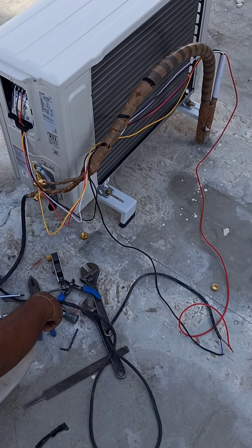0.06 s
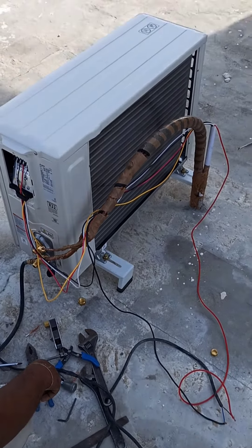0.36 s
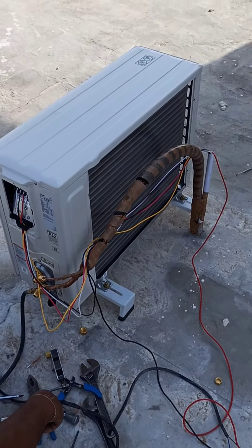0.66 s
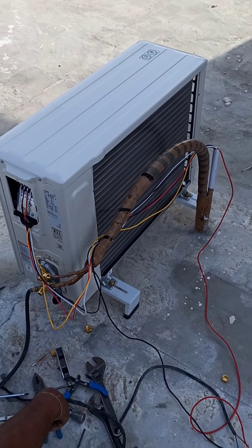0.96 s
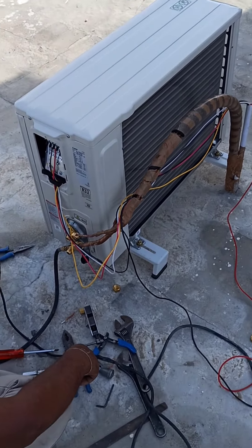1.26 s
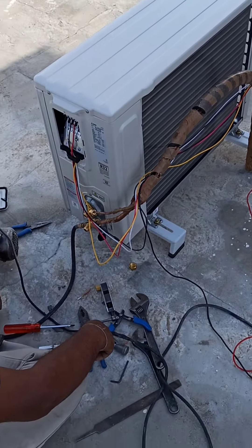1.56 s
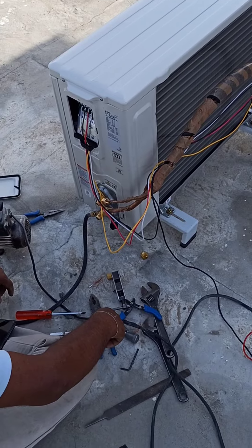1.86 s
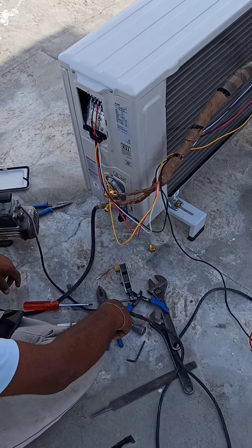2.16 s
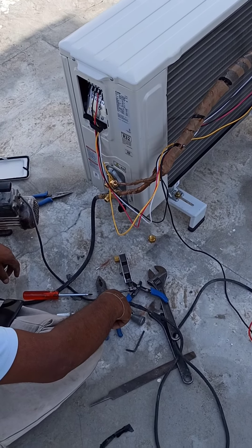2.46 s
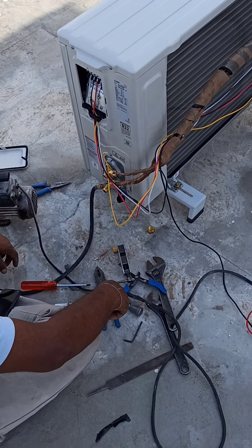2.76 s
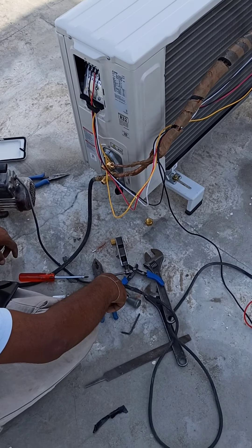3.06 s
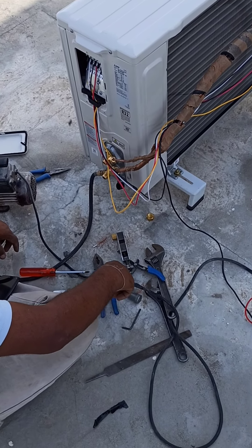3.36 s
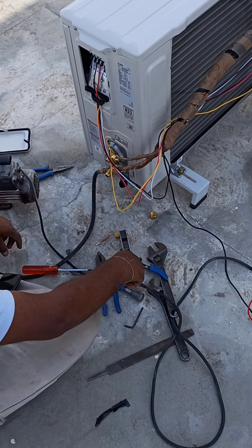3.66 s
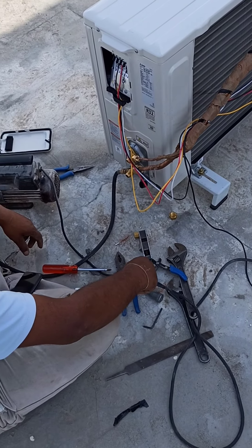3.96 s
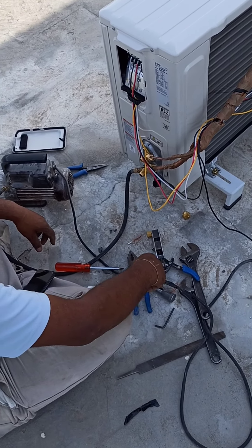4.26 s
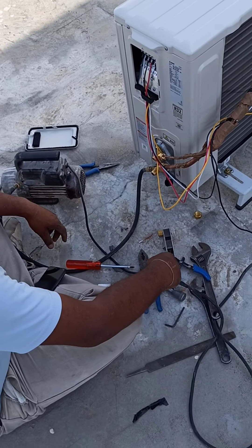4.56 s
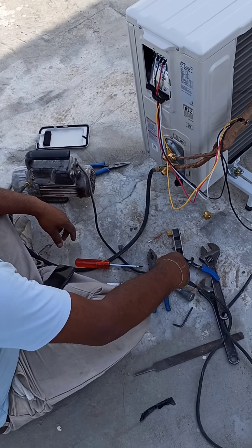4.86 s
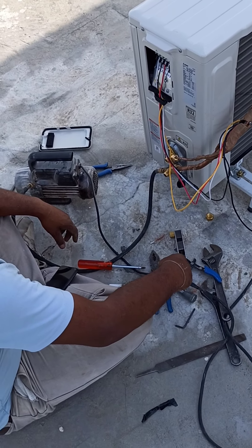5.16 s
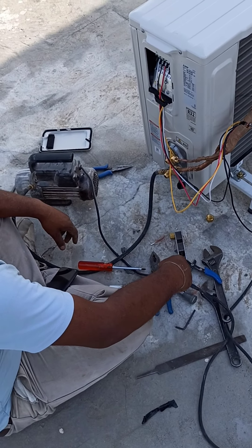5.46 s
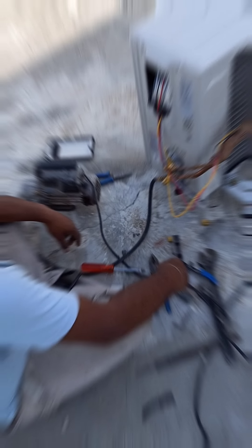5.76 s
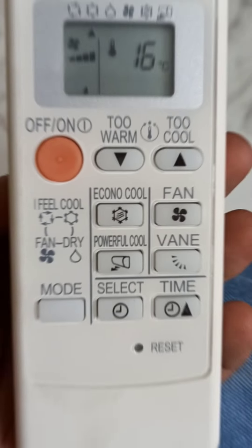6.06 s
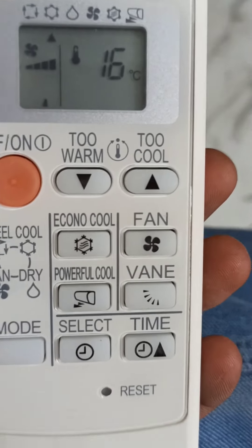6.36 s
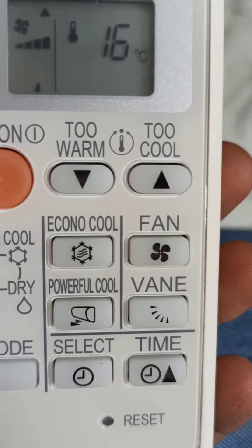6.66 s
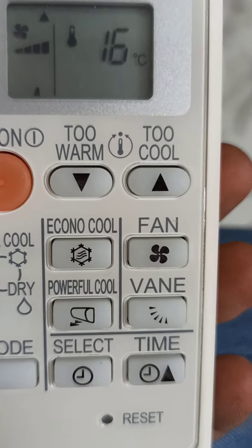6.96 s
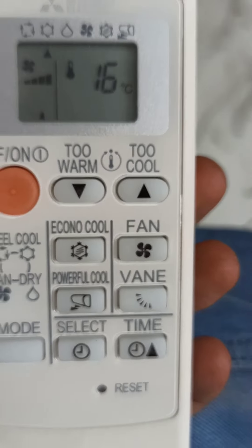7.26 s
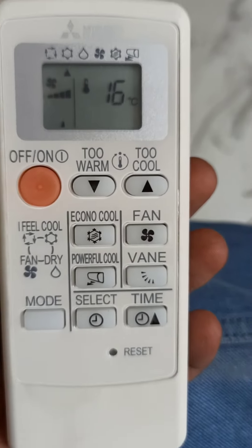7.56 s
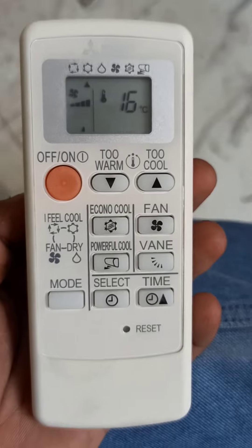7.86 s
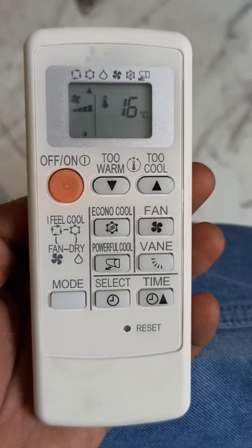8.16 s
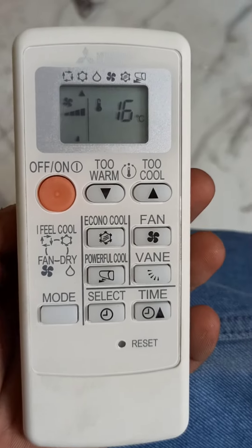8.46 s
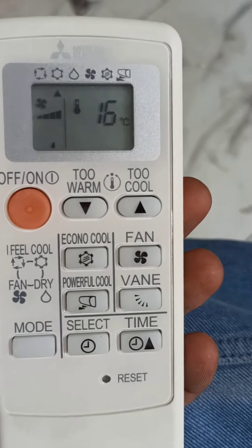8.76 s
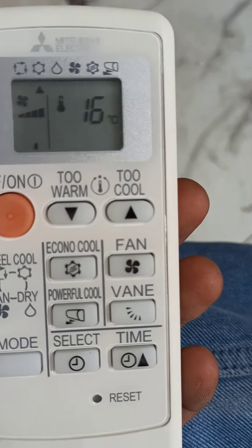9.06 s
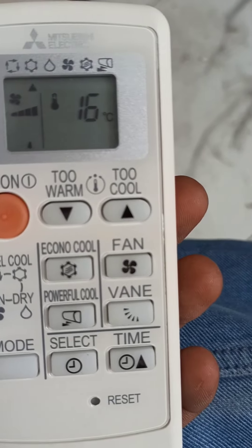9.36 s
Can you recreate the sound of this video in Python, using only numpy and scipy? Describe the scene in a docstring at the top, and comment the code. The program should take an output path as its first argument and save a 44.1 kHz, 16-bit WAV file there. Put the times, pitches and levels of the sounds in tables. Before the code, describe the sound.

A small electric vacuum pump runs steadily on an open rooftop, its motor humming and whining with a fine rattle in the casing. Wind hits the hand-held microphone with irregular low rumbles, pops and puffs. After about six seconds the sound cuts off abruptly. It returns at once without the pump: stronger gusts, a faint wash of distant town noise and one brief, faraway squeal.

```python
"""A small electric vacuum pump buzzes on an open rooftop, heard through a hand-held phone.
Its motor hums and whines, and its vanes rattle in the casing. Wind pushes swirls of air (eddies)
against the microphone, making rumbles, pops and puffs. Near 5.9 s the phone is paused and the buzz
stops dead. The sound comes back away from the pump, with stronger wind, the wash of the town
fading in and one faint, far squeal."""
import sys
import numpy as np
from scipy import signal
from scipy.fft import rfft, irfft, next_fast_len
from scipy.io import wavfile
from scipy.ndimage import uniform_filter1d, map_coordinates

SR = 44100
rng = np.random.default_rng(int(sys.argv[2]) if len(sys.argv) > 2 else 0)


def wav_record(signal):
    """Record a signal, one row per channel, as 16-bit PCM in the file named by sys.argv[1]."""
    frames = np.transpose(np.atleast_2d(signal))
    bounded = np.clip(frames, -1, 1)
    # unit amplitude maps onto the largest positive 16-bit level
    quanta = np.round(bounded * 32767).astype(np.int16)
    wavfile.write(sys.argv[1], SR, quanta)


N = 415863
TIME = np.arange(N) / SR
PAUSE_S, RESUME_S = 5.873, 5.967
HUM_HZ = 100.2


def gain_of(db):
    """Turns decibels into a factor to multiply a sound by."""
    return 10 ** (np.asarray(db) / 20)


def evened(x):
    """Scales x so that its average size (rms) is 1."""
    return x / np.sqrt(np.mean(x ** 2) + 1e-20)


def follow(rows):
    """Joins rows of (t/s, value) with straight lines."""
    return np.interp(TIME, *np.transpose(rows))


def bell(offset, width):
    """A smooth hump of height 1."""
    return np.exp(-2 * (offset / width) ** 2)


def drift(rate):
    """A smooth random wobble of rms 1, heading for a new value `rate` times a second."""
    targets = rng.standard_normal(4096)
    coarse = TIME[::32]
    curve = map_coordinates(targets, [coarse * rate], order=3, mode="wrap")
    return evened(np.interp(TIME, coarse, curve))


def shaped(x, colour, resonances=()):
    """Filters x by a colour (f/Hz, level/dB) and by resonances (f/Hz, width/Hz, gain/dB)."""
    size = next_fast_len(len(x))
    hz = np.fft.rfftfreq(size, 1 / SR)
    colour_hz, colour_db = np.transpose(colour)
    db = np.interp(np.log(hz + 1), np.log(colour_hz + 1), colour_db)
    db += sum(peak / (1 + (2 * (hz - f) / width) ** 2) for f, width, peak in resonances)
    return irfft(rfft(x, size) * gain_of(db), size)[:len(x)]


def coloured(x, colour, resonances=()):
    """Shapes x, then scales it to rms 1."""
    return evened(shaped(x, colour, resonances))


def treble_above(x, hz, order):
    """Keeps what lies above hz; a higher order cuts more sharply."""
    return signal.sosfilt(signal.butter(order, hz, "high", fs=SR, output="sos"), x)


def tone(cycles, db):
    """A pure tone with this rms level, starting anywhere in its cycle."""
    return np.sqrt(2) * gain_of(db) * np.sin(2 * np.pi * (cycles + rng.random()))


def standing_waves(t, hz, width_hz=340):
    """Gain in dB, by time and frequency, as the phone drifts through loud and dead spots."""
    # spots the phone passes: t/s, length/s, f/Hz, gain/dB
    spots = [(0.43, 0.51, 2004, 9), (1.83, .6, 2004, 10), (1.35, 0.44, 2605, 7), (2.12, 0.81, 2550, 9.5),
             (3.73, 0.61, 1780, 9), (5.39, 0.7, 1780, 9.5), (0.11, 0.5, 3250, -13), (0.61, .25, 3550, 4),
             (1.3, 0.6, 3320, -11), (2, 0.48, 3500, 7), (2.14, 1.2, 2950, -9), (3.44, 0.56, 3450, 11),
             (4.49, 0.32, 3500, 10), (5.34, 0.37, 3490, 10), (0.72, .35, 4350, -12), (1.7, 0.57, 4450, 2),
             (3.5, 0.49, 4480, -4), (4.1, 0.13, 3550, -5.5), (4.97, 0.15, 3700, -5), (5.07, .2, 4450, -6),
             (5.84, .5, 4380, -14), (2.13, 1.2, 6350, -12.5), (3, 1.2, 5440, -9)]
    return sum(db * bell(t - at, length) * bell(hz - f, width_hz) for at, length, f, db in spots)


def motor(clock, shaft_angle, wander_db=1.75, lift_db=0.04):
    """Magnetic buzz and whining tones; each wanders and flutters, the high ones more."""
    # magnetic buzz: multiple of the hum, level/dB
    buzz = [(8, -66), (9, -67), (16, -68.5), (18, -70.5), (20, -67), (26, -64), (27, -70.5), (28, -68),
            (30, -64.5), (32, -66), (34, -62), (35, -73), (36, -55), (37, -77), (38, -59), (39, -71),
            (40, -65)]
    # whine of the rotor's slots and vanes: f/Hz, level/dB
    whine = [(883, -65.5), (983, -62), (1021, -64.5), (1083, -59), (1183, -64), (3935, -77), (3984, -61),
             (4191, -56), (4425, -53), (4589, -61.5), (4689, -67), (5435, -67.5), (6430, -60.5)]
    flutter_cycles, swing_cycles, throb = .05, .07, .17
    coarse = TIME[::256]
    out = np.zeros(N)
    for hz, db in [(multiple * HUM_HZ, db) for multiple, db in buzz] + list(whine):
        swell_db = np.interp(TIME, coarse, standing_waves(coarse, hz))
        swell_db += wander_db * min(hz / 3000, 1) * drift(2.634)
        highness = min(hz / 4000, 1)
        flutter = flutter_cycles * drift(45)
        # the load swings once per turn of the shaft, so pitch and level throb
        swing = swing_cycles * np.sin(shaft_angle + 2 * np.pi * rng.random())
        pulsing = 1 + throb * highness * np.cos(shaft_angle)
        out += pulsing * tone(hz * clock + highness * (flutter + swing), db + lift_db + swell_db)
    return out


def reflected(x, echo=0.15, sway_s=.00012, delays_s=(.0029, .0047, .0083)):
    """Adds echoes off the concrete and a metal cabinet; their delays shift as the hand sways."""
    echoes = sum(np.interp(TIME - delay + sway_s * drift(1.206), TIME, x) for delay in delays_s)
    return x + echo * echoes


def through_spots(x, depth=0.28):
    """Noise meets the same standing waves as the tones, but rises and sinks less."""
    hz, t, spectrum = signal.stft(x, SR, nperseg=1024)
    gain = gain_of(depth * standing_waves(t, hz[:, None]))
    return signal.istft(spectrum * gain, SR)[1][:N]


def rattle(clock, shaft_angle, pull=.3, throb=.07, repeat=0.75):
    """Vanes scrape in the casing, pulsed by the motor's pull and by each turn of the shaft."""
    # strength of the rattle: t/s, level/dB
    loudness = [(0, -47), (.25, -46), (.8, -46.5), (1.3, -46), (2.7, -46.5), (4.3, -45), (5.85, -45)]
    # its broad colour: f/Hz, level/dB
    colour = [(60, -8), (300, 0), (600, -6.5), (1000, -5), (1550, -12), (1900, -13), (2450, -5),
              (2950, -11), (3900, 0), (4650, -4), (4900, -12.5), (7550, -10.5), (7750, -25.5), (8450, -27)]
    # the casing's resonances and dips: f/Hz, width/Hz, gain/dB
    resonances = [(1307, 96, 8), (5050, 120, 5), (5330, 120, -3.5), (5520, 190, 7), (5880, 170, -4.5),
                  (6150, 150, 4.5), (6360, 110, 10), (6980, 110, -2.5), (7510, 250, 5), (8220, 37, 12.5)]
    hum_cycles = HUM_HZ * clock
    pulsing = 1 + pull * np.cos(4 * np.pi * hum_cycles) + throb * np.cos(shaft_angle)
    # part of the scraping repeats with every cycle of the hum, making faint high tones
    size = round(SR / HUM_HZ)
    phases = 2 * np.pi * rng.random(size // 2 + 1)
    one_cycle = evened(irfft(np.exp(1j * phases), size))
    looped = map_coordinates(one_cycle, [hum_cycles % 1 * size], order=3, mode="grid-wrap")
    scrape = pulsing * (rng.standard_normal(N) + repeat * treble_above(looped, 5080, order=6))
    ringing = coloured(reflected(scrape), colour, resonances)
    return gain_of(follow(loudness)) * through_spots(ringing)


def pump(shaft_hz=19.05, wobble_s=.00005):
    """Motor and vanes share one slightly unsteady speed."""
    clock = TIME + wobble_s * drift(5)
    shaft_angle = 2 * np.pi * shaft_hz * clock
    return motor(clock, shaft_angle) + rattle(clock, shaft_angle)


def wind_level(rise_s=.015, fall_s=.015):
    """Strength of the wind in dB: each gust rises, holds and dies away on top of the breeze."""
    # light air that never stops: t/s, level/dB
    breeze = [(0.0, -37.5), (0.7, -40.5), (0.82, -50.0), (1.25, -46.0), (1.9, -52.0), (3.0, -56.5),
              (3.75, -45.0), (4.1, -54.0), (4.35, -45.0), (5.1, -47.0), (5.8, -37.0), (6.0, -41.5),
              (6.75, -36.0), (7.1, -39.5), (7.7, -36.0), (7.92, -42.5), (8.6, -34.0), (9.43, -41.5)]
    # gusts that hit the microphone: start/s, hold/s, level/dB
    gusts = [(0.0, 0.036, -32.0), (0.126, 0.068, -27.0), (0.282, 0.11, -28.5), (0.554, 0.21, -32.5),
             (0.857, 0.12, -37.5), (1.048, 0.075, -38.5), (1.177, 0.12, -38.0), (1.534, 0.016, -40.5),
             (1.652, 0.084, -38.0), (2.372, 0.014, -35.5), (3.373, 0.015, -40.5), (3.546, 0.019, -36.5),
             (3.769, 0.09, -32.5), (4.185, 0.014, -26.0), (4.382, 0.023, -36.5), (4.486, 0.03, -40.0),
             (4.746, 0.058, -34.5), (5.347, 0.242, -37.5), (5.666, 0.12, -35.0), (6.173, 0.11, -28.5),
             (6.429, 0.25, -29.5), (6.747, 0.036, -28.0), (6.822, 0.09, -25.5), (6.936, 0.069, -29.0),
             (7.186, 0.186, -28.5), (7.384, 0.075, -25.0), (7.573, 0.1, -30.5), (7.84, 0.019, -33.0),
             (7.985, 0.069, -27), (8.198, 0.094, -34.5), (8.421, 0.1, -37.5), (8.633, 0.12, -28.0),
             (8.879, 0.049, -28), (8.941, 0.16, -26.5), (9.118, 0.109, -32.5), (9.386, 0.024, -31)]
    power = gain_of(follow(breeze)) ** 2
    for start, hold, db in gusts:
        age = TIME - start
        rise = np.clip(age / rise_s, 0, 1)
        fall = np.exp(-np.clip(age - hold, 0, 1) / fall_s)
        power += (gain_of(db) * rise * fall) ** 2
    return 10 * np.log10(power)


def wind(strong_gust_db=-29, db_per_doubling=46, surge_db=1.5, lump_db=1.38, eddies_per_s=300):
    """A fixed pattern of eddies blows past the microphone: faster wind is louder and brighter."""
    # colour of the eddies in a strong gust: f/Hz, level/dB
    colour = [(30, -7.5), (110, 5), (210, -0.5), (320, -7), (500, -19.5), (800, -32.5), (1500, -51),
              (9000, -78)]
    # the phone's angle to the wind makes eddies finer or coarser: t/s, frequency factor
    facing = [(.3, 0.89), (1.3, 1.06), (3.8, 1.045), (4.2, 0.74), (5.7, 0.87), (6.3, 1.07), (7.3, .97),
              (7.9, 1.147), (8.8, 1.12)]
    level_db = wind_level() + surge_db * drift(25)
    roughness_db = lump_db * drift(70)
    speed = follow(facing) * 2 ** ((level_db + roughness_db - strong_gust_db) / db_per_doubling)
    # separate eddies, each one bump of pressure, ride on finely churning air
    eddies = evened(rng.standard_normal(N) * (rng.random(N) < eddies_per_s / SR))
    pattern = coloured(eddies + 0.67 * rng.standard_normal(N), colour)
    passing = map_coordinates(pattern, [np.cumsum(speed)], order=3, mode="wrap")
    pressure = gain_of(roughness_db) * passing
    # even it out over 50 ms, so that level_db sets the loudness
    local_rms = np.sqrt(abs(uniform_filter1d(pressure ** 2, size=2200)) + 1e-9)
    return gain_of(level_db) * pressure / local_rms


def pops():
    """Each hard eddy is one push and pull of pressure."""
    # hard eddies: t/s, peak level/dB, f/Hz
    hard_eddies = [(0.18, -16.5, 237), (0.248, -15.5, 195), (.301, -16, 300), (.583, -22.5, 326),
                   (.594, -19.5, 282), (.604, -23.5, 380), (.747, -22, 200), (3.68, -24, 184.7),
                   (4.199, -26, 129), (5.155, -29, 217.2), (5.515, -24, 241.2), (6.206, -20, 200),
                   (6.882, -18.5, 228.1), (6.907, -22, 296), (7.234, -19.5, 218), (7.409, -24.5, 202),
                   (7.446, -19.5, 179), (8.68, -21, 260.7), (9.023, -19, 189), (9.198, -20.5, 264)]
    out = np.zeros(N)
    for at, db, hz in hard_eddies:
        middle = round(at * SR)
        near = slice(max(middle - SR // 20, 0), middle + SR // 20)
        angle = 2 * np.pi * hz * (TIME[near] - at)
        out[near] -= gain_of(db) * angle * np.exp((1 - angle ** 2) / 2)
    return out


def puffs():
    """Short, brighter rushes of air graze the microphone's opening."""
    # rushes of air: t/s, length/s, level/dB
    rushes = [(0.515, 0.1, -40.5), (6.491, 0.31, -44.5), (7.145, 0.13, -42.5), (9.1, 0.77, -50)]
    # their colour: f/Hz, level/dB
    colour = [(100, 0), (400, 2.5), (750, -3.5), (1300, -19), (2500, -25.5), (6000, -42.5)]
    swell = sum(gain_of(db) * bell(TIME - at, length) for at, length, db in rushes)
    return swell * coloured(rng.standard_normal(N), colour)


def town(lift_db=8):
    """The distant town blurs into a wash of noise with a faint, steady drone."""
    # strength of the wash before the lift: t/s, level/dB
    loudness = [(5.98, -79), (6.12, -64), (6.25, -60.5), (6.48, -58), (6.95, -61.5), (7.55, -59.5),
                (8.1, -59.5), (8.9, -61), (9.1, -57.5), (9.25, -61)]
    # its colour: f/Hz, level/dB
    colour = [(60, -15.5), (300, 2.5), (1000, 0.5), (1500, -7), (2400, -9.5), (3500, -14), (4600, -16.5),
              (5000, -25), (5900, -25.5), (6400, -15.5), (7400, -16), (8000, -34), (8600, -27.5)]
    # the drone, a narrow peak in the wash: f/Hz, width/Hz, gain/dB
    drone = [(674, 18, 10)]
    return gain_of(follow(loudness) + lift_db) * coloured(rng.standard_normal(N), colour, drone)


def squeal(waver=.011, flicker_db=3, fade_s=.02):
    """A far squeal, perhaps a brake: a few high tones that waver and flicker."""
    # tones of the squeal: start/s, end/s, f/Hz, level/dB
    tones = [(6.37, 6.567, 2765, -60), (6.445, 6.67, 3064, -65.5), (6.48, 6.6, 2090, -64),
             (6.46, 6.53, 6280, -70)]
    out = np.zeros(N)
    for start, end, hz, db in tones:
        fade = np.clip(np.minimum(TIME - start, end - TIME) / fade_s, 0, 1)
        pitch_hz = hz * (1 + waver * drift(160))
        out += fade * tone(np.cumsum(pitch_hz) / SR, db + flicker_db * drift(60))
    return out


def scene():
    """The pump before the pause, the town and the squeal after it, wind throughout."""
    air = wind() + pops() + puffs()
    return (air + np.where(TIME < PAUSE_S, pump(), town() + squeal()))[None]


def record(dry, hiss_before_db=-75, hiss_after_db=-80, hiss_fade_s=.22, top_hz=15700):
    """The phone cuts deep bass and high treble, adds a thin hiss, and is silent while paused."""
    # how well the microphone hears each frequency: f/Hz, gain/dB
    microphone = [(30, -26.5), (40, -18), (50, -15.5), (70, -2.5), (100, 1), (8300, -0.5), (8800, -15.5),
                  (10500, -25.5), (12000, -39.5)]
    # colour of the hiss: f/Hz, level/dB
    hiss_colour = [(11800, -4.0), (14500, -0.5), (16000, -1.5), (17000, -27.0)]
    hiss = coloured(treble_above(rng.standard_normal(N), 11800, order=16), hiss_colour)
    fade_in = np.clip((TIME - RESUME_S) / hiss_fade_s, 0, 1)
    hiss_gain = np.where(TIME < PAUSE_S, gain_of(hiss_before_db), gain_of(hiss_after_db) * fade_in)
    heard = shaped(dry[0], microphone) + hiss_gain * hiss
    running = uniform_filter1d(1. * ((TIME < PAUSE_S) | (TIME > RESUME_S)), size=40)
    treble_cut = signal.firwin(511, top_hz, window=("kaiser", 9), fs=SR)
    return signal.oaconvolve(heard * running, treble_cut, "same")[None]


dry = scene()
out = record(dry)
wav_record(out)
```